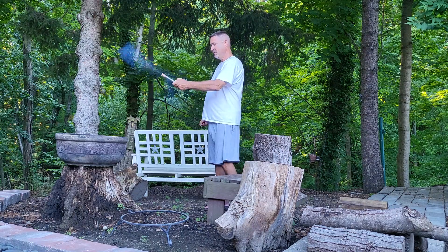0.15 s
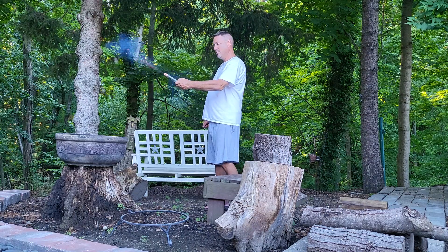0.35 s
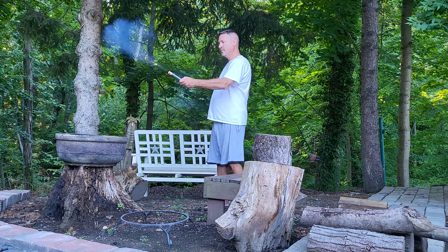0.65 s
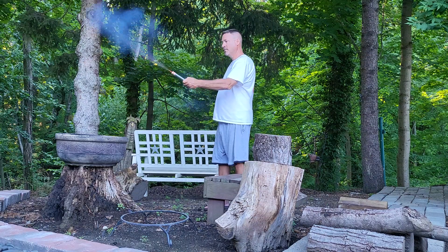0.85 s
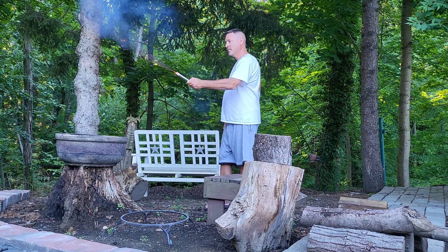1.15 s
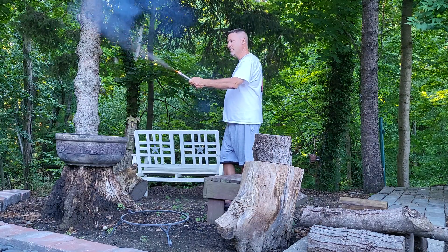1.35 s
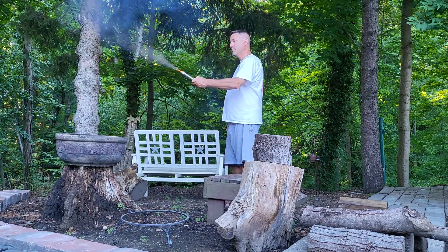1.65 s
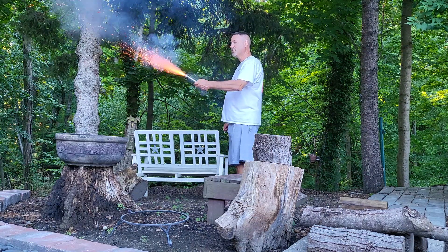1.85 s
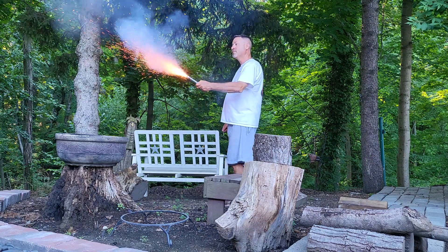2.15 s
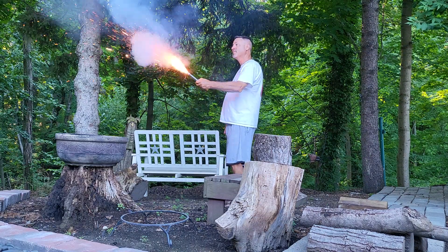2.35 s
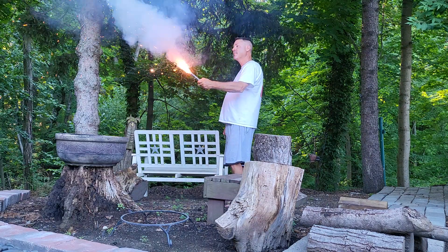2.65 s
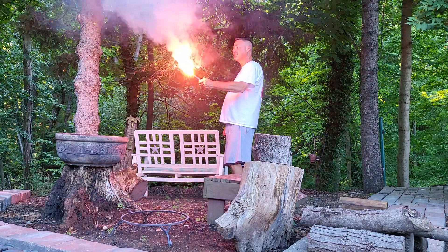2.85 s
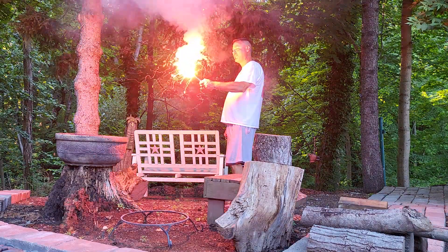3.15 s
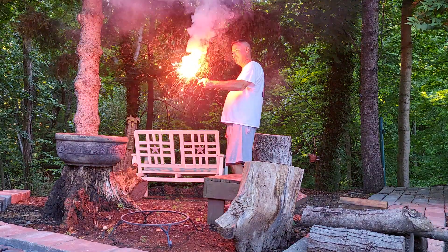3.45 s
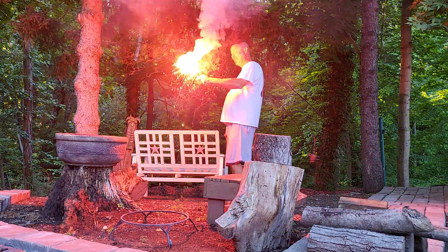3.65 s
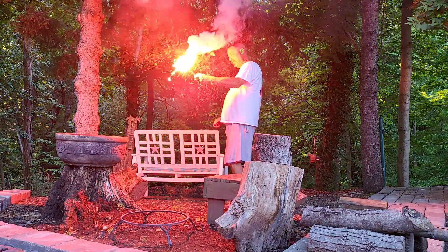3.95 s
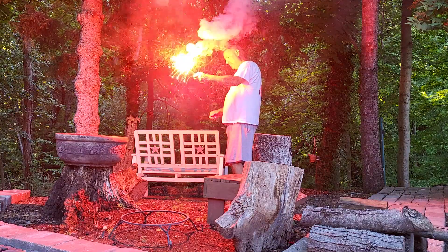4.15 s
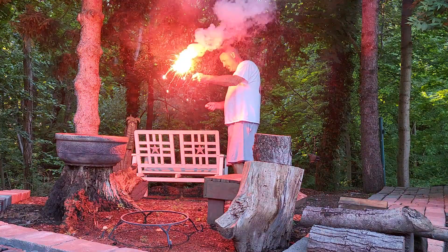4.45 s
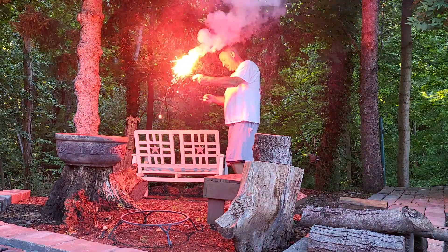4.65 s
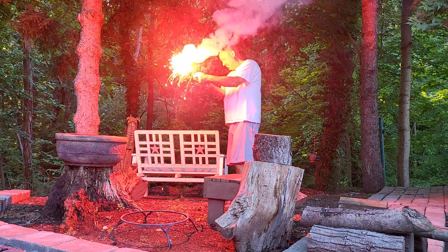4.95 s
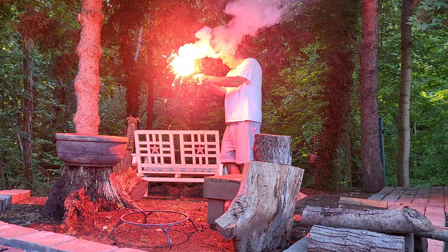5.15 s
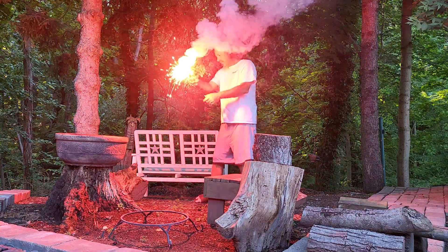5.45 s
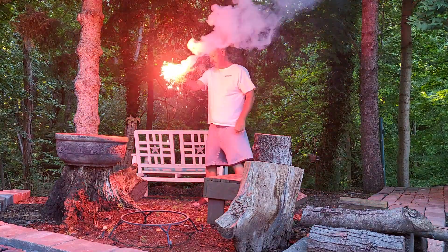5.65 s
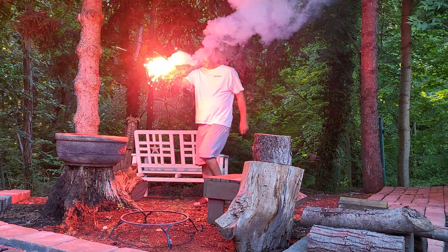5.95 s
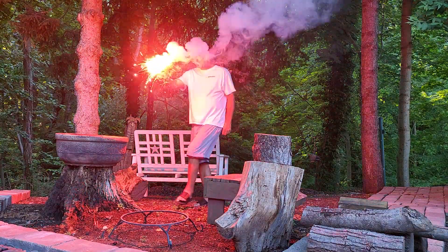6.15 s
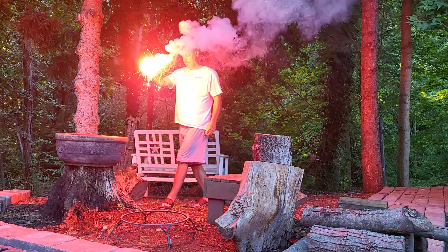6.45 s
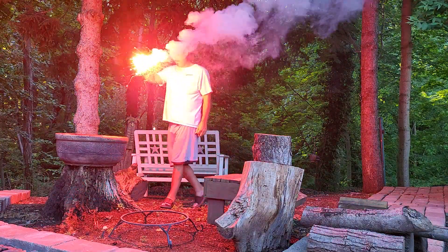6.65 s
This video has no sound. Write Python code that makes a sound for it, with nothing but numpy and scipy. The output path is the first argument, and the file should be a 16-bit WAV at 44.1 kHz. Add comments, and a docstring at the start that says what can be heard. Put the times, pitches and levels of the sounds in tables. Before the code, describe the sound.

Outdoors in a wooded yard, a handheld flare is heard from a few metres through a stereo camera microphone, over very faint open-air murmur. At 0 s it smoulders with a thin hiss and low gassy drone; small spits begin near 0.14 s and cluster from 0.4 s. The hiss swells quickly through 0.7-1.0 s, with irregular snaps, raspy bursts and low puffs continuing to 1.75 s. At about 1.8 s a sharp, loud bang cracks, with a short slap echo and tree scatter. The hiss cuts away to a soft, fluttering jet, weakening until a muted whoomph around 2.4 s. A fine sizzle grows from 2.5 s, rises steeply around 3.0-3.3 s, and from 3.8 s stays a loud, bright, gritty hiss with dense sparks and soft low flame rumble, gently surging until the end near 7 s, without fading.

```python
"""Handheld flare in a wooded yard

A flare is lit a few metres from a camera with two microphone ports, in the faint murmur of open air.
Its primer hisses and spits ever harder, blows out with a bang and leaves a soft jet of flame;
then the main charge catches and burns with a loud hiss, fine sparks and a rumbling flame.
Gas is shaped noise, sparks are random bursts, and snaps and bang are pressure shocks.
Stumps, a wall and the trees answer with echoes and scattered tails."""
import sys
import numpy as np
from scipy import signal
from scipy.fft import rfft, irfft, next_fast_len
from scipy.io import wavfile
from scipy.ndimage import map_coordinates

SR = 44100
rng = np.random.default_rng(int(sys.argv[2]) if len(sys.argv) > 2 else 0)


def bounce(signal):
    """Save signal as a 16-bit WAV file at the path given by the first command-line argument."""
    frames = np.transpose(np.atleast_2d(signal))
    limited = np.clip(frames, -1, 1)
    pcm = np.round(limited * 32767).astype(np.int16)
    wavfile.write(sys.argv[1], SR, pcm)


N = 299880


def amp(db):
    """Amplitude factor of a level in dB."""
    return 10 ** (np.asarray(db) / 20)


def unit(x):
    """x at rms 1."""
    return x / np.sqrt(np.mean(x ** 2) + 1e-20)


def along(points, hz):
    """Reads (frequency [Hz], value) points on a log frequency axis."""
    point_hz, values = np.transpose(points)
    return np.interp(np.log(hz + 1), np.log(point_hz + 1), values)


def curves(rows):
    """One value per sample for each column after the time."""
    times, *columns = np.transpose(rows)
    return [np.interp(np.arange(N) / SR, times, column) for column in columns]


def ramp(start, length):
    """Rises from 0 to 1 over length seconds."""
    return np.clip((np.arange(N) / SR - start) / length, 0, 1)


def swell(centre, half_length):
    """A smooth rise to 1 and back, down to 1/e at half_length seconds from the centre."""
    return np.exp(-((np.arange(N) / SR - centre) / half_length) ** 2)


def since(start):
    """Seconds gone by after start, 0 before it."""
    return np.maximum(np.arange(N) / SR - start, 0)


def wobble(rate):
    """A smooth random curve, rate knots a second."""
    knots = rng.standard_normal(int(N * rate / SR) + 4)
    return map_coordinates(knots, [np.arange(N) * rate / SR])


def filtered(x, response):
    """x times a response of frequency."""
    size = next_fast_len(N + SR // 2)
    spectrum = rfft(x, size) * response(np.fft.rfftfreq(size, 1 / SR))
    return irfft(spectrum, size)[..., :N]


def coloured(x, spectrum):
    """x shaped by the given spectrum, at rms 1."""
    return unit(filtered(x, lambda hz: amp(along(spectrum, hz))))


def rush(spectrum, flutter_db, rate):
    """Turbulent noise whose strength flutters."""
    return coloured(rng.standard_normal(N) * amp(flutter_db * wobble(rate)), spectrum)


def crackle(spectrum, rate, spread_db):
    """Tiny bursts at random moments, rate a second on average, most small, a few large."""
    fires = rng.random(N) < rate / SR
    size = amp(spread_db * np.clip(rng.standard_normal(N), -2.5, 2.5))
    return coloured(fires * size * rng.choice([-1, 1], N), spectrum)


def shock(start, width):
    """A small explosion: a pressure step, then suction."""
    u = np.maximum(np.arange(N) / SR - start, 0) / width
    return (u > 0) * (1 - u) * np.exp(-np.minimum(u, 30))


# Murmur of the open air around the yard: (frequency [Hz], level [dB])
AIR_SPECTRUM = [(20, -14), (60, -2), (160, 5), (350, -10.5), (1000, -14.5), (3000, -3), (15000, -39)]


def air():
    """The faint steady murmur of the open air, nearly alike at both ports."""
    mid, side = (coloured(noise, AIR_SPECTRUM) for noise in rng.standard_normal((2, N)))
    return amp(-59.5) * (mid + amp(-9) * np.array([side, -side]))


def scatter(x, t60, share, build, count, size):
    """A diffuse stereo answer of decaying noise, renewed count times as the flame moves."""
    hz, t, grains = signal.stft(rng.standard_normal((count, 2, size)), SR, nperseg=256)
    level_db = along(share, hz)[:, None] - 60 * t / along(t60, hz)[:, None]
    fade = amp(level_db) * (1 - np.exp(-t / build))
    tails = signal.istft(grains * fade, SR, nperseg=256)[1]
    hop = N // (count - 1) + 1
    window = np.sqrt(np.hanning(2 * hop))
    padded, out = np.pad(x, (hop, 2 * hop)), np.zeros((2, N + 3 * hop + SR))
    for k, tail in enumerate(tails):
        piece = padded[k * hop:][:2 * hop] * window
        answer = signal.fftconvolve(piece[None], tail / np.linalg.norm(tail[0]), axes=1)
        out[:, k * hop:k * hop + answer.shape[1]] += answer
    return out[:, hop:hop + N]


# Hard surfaces (a ledge by the camera, the ground, a wall): (delay [ms], level [dB])
HARD_ECHOES = [(1.07, -6.5), (6.1, -23.5), (47, -15)]
# Bearing of the flare: (time [s], lead of the left port [ms])
FLARE_BEARING = [(0, 0.1), (3.3, 0.069), (5.4, 0.081), (6, 0.09), (6.8, 0.12)]
# What the stumps send back: (frequency [Hz], level [dB])
STUMP_RETURN = [(100, -14), (400, -6.5), (1500, -7.5), (4000, -1.5), (8000, -1), (15000, 0)]
# What the trees send back: (frequency [Hz], level [dB])
TREE_RETURN = [(100, -4), (400, -2.8), (3000, 1), (8000, 2.1), (15000, 1.5)]
# How long the trees ring on: (frequency [Hz], 60 dB decay time [s])
TREE_DECAY = [(60, 0.11), (500, 0.4), (1400, 0.46), (3300, 0.71), (6000, 0.52), (14000, 0.42)]


def yard(x, rough_hz=6500):
    """Direct sound and hard echoes reach the two ports; stumps and trees scatter the rest."""
    def near_response(hz):
        echoes = sum(amp(db) * np.exp(-2j * np.pi * hz * ms / 1000) for ms, db in HARD_ECHOES)
        return 1 + echoes / (1 + (hz / rough_hz) ** 4)  # rough surfaces mirror little treble

    near = filtered(x, near_response)
    lead_ms, = curves(FLARE_BEARING)
    half_lead = lead_ms * SR / 2000  # samples; each port is shifted by half the lead
    direct = np.array([map_coordinates(near, [np.arange(N) + side * half_lead], order=5)
                       for side in (1, -1)])
    stump_decay = [(200, 0.084), (12000, 0.096)]  # (frequency [Hz], 60 dB decay time [s])
    stumps = scatter(x, stump_decay, STUMP_RETURN, build=0.00071, count=240, size=3072)
    trees = scatter(x, TREE_DECAY, TREE_RETURN, build=0.012, count=60, size=20480)
    return amp(-3.0) * direct + amp(-2.0) * stumps + amp(-7.5) * trees


# Peaks and hollows of the camera's nook: (frequency [Hz], width [Hz], level [dB])
NOOK_RESONANCES = [(168, 26, 2.5), (348, 25, 4), (617, 36, 2.5), (1210, 120, 2), (1534, 66, -7),
                   (1840, 97, 1.5), (2410, 280, -4), (3440, 400, -1.5), (3900, 174, 3), (4120, 150, 1.5),
                   (4860, 83, 3), (6000, 210, -1.5), (6500, 250, 3.5), (7300, 230, 4.5)]


def nook(hz):
    """Causal resonant peaks and hollows of the sound at the camera."""
    return np.prod([1 + (amp(db) - 1) * 1j * hz * width / (centre ** 2 - hz ** 2 + 1j * hz * width)
                    for centre, width, db in NOOK_RESONANCES], axis=0)


# Shading of the two microphone ports: (frequency [Hz], left minus right [dB])
PORT_SHADING = [(300, 0), (1100, 1.8), (2100, 0), (2900, 3.5), (4000, 0), (4900, -0.5), (6500, 5),
                (7300, 6), (8100, -4.5), (9300, 4), (11500, 4), (13500, 5.5)]


def ports(hz):
    """Each microphone port shades the sound in its own way; their summed power is kept."""
    lean = amp(along(PORT_SHADING, hz))
    return np.array([lean, np.ones_like(lean)]) * np.sqrt(2 / (1 + lean ** 2))


def spit_gate(start, length, rise=0.0012, fall=0.0059):
    """Opens fast, holds while a spit lasts, then dies away exponentially."""
    return ramp(start, rise) * np.exp(-30 * ramp(start + length, 30 * fall))


# The primer's spits; the last is its blow-out:
# (start [s], length [s], rasp level [dB], puff level [dB])
PRIMER_SPITS = [(0.138, 0.016, -50, -47), (0.406, 0.026, -45.5, -47), (0.453, 0.0091, -49, -45),
                (0.495, 0.0045, -48, -38), (0.527, 0.018, -45, -46), (0.625, 0.012, -43.5, -55),
                (0.678, 0.018, -44, -43), (0.775, 0.015, -38, -34.5), (0.887, 0.0048, -28.5, -42),
                (0.907, 0.015, -39, -40), (0.941, 0.013, -26.5, -23.5), (0.974, 0.02, -33.5, -24),
                (1.058, 0.01, -32.5, -28.5), (1.085, 0.015, -33, -27.5), (1.129, 0.021, -32, -32),
                (1.156, 0.017, -26, -29.5), (1.21, 0.0077, -31.5, -46), (1.26, 0.017, -28.5, -24.5),
                (1.348, 0.019, -27.5, -30), (1.429, 0.017, -29, -29), (1.539, 0.018, -25.5, -25.5),
                (1.602, 0.016, -24, -24.5), (1.717, 0.025, -25, -30), (1.794, 0.022, -18, -26)]
# Hiss of the primer: (frequency [Hz], level [dB])
PRIMER_SPECTRUM = [(150, -36), (500, -15), (1300, -9), (2000, -5), (3000, -5), (4000, -1.5), (5300, -2.5),
                   (7000, 1.5), (9000, -4), (11000, -3.5), (14000, -0.5)]
# Drone of gas in the tube's mouth: (frequency [Hz], level [dB])
DRONE_SPECTRUM = [(25, -24), (62, 0.5), (100, -7), (175, 1.5), (250, -12), (350, -8.5), (480, -15.5),
                  (900, -23.5), (2000, -36.5)]
PRIMER_START_DB = -49.5  # the primer smoulders at first
# The fire spreads in an S-curve: fastest moment [s], time constant [s], growth [dB]
SPREAD_AT, SPREAD_TIME_S, SPREAD_DB = 0.69, 0.26, 27
# The primer chokes once, then flares up just before it blows out: moment [s], half length [s], change [dB]
FALTER_AT, FALTER_S, FALTER_DB = 1.03, 0.033, 4.5
FLARE_UP_AT, FLARE_UP_S, FLARE_UP_DB = 1.752, 0.032, 3.5
SURGE_DB, SURGE_SHRINK = 8.5, 0.27  # a spit's lift of the smouldering hiss; dB of lift lost per dB of growth
# The drone weakens as the mouth burns open
DRONE_DB, DRONE_FADE_AT, DRONE_FADE_DB_PER_S = -42, 0.93, 4


def primer():
    """The primer hisses and crackles, lifted by spits, until spent; its gas drones in the tube's mouth."""
    growth_db = SPREAD_DB / (1 + np.exp((SPREAD_AT - np.arange(N) / SR) / SPREAD_TIME_S))
    falter_db = FALTER_DB * swell(FALTER_AT, FALTER_S)
    flare_up_db = FLARE_UP_DB * swell(FLARE_UP_AT, FLARE_UP_S)
    level_db = PRIMER_START_DB + growth_db - falter_db + flare_up_db
    surge_db = np.maximum(SURGE_DB - SURGE_SHRINK * growth_db, 0)
    spitting = sum(spit_gate(start, length) for start, length, _, _ in PRIMER_SPITS)
    hiss = rush(PRIMER_SPECTRUM, flutter_db=1.9, rate=120)
    gas = hiss + amp(-4.0) * crackle(PRIMER_SPECTRUM, rate=1100, spread_db=3.5)
    drone_db = DRONE_DB - DRONE_FADE_DB_PER_S * since(DRONE_FADE_AT)
    drone = amp(drone_db) * rush(DRONE_SPECTRUM, flutter_db=1.2, rate=25)
    return (amp(level_db + surge_db * spitting) * gas + drone) * (1 - ramp(1.775, 0.02))


# Rasp of a spit: (frequency [Hz], level [dB])
RASP_SPECTRUM = [(100, -21), (350, 1.5), (700, -1.5), (2000, 0), (4000, -5), (8000, -11), (15000, -15)]
# Low puff of a spit: (frequency [Hz], level [dB])
PUFF_SPECTRUM = [(25, -28), (60, -5.5), (100, -2.5), (165, 0.5), (240, -8.5), (380, -7), (700, -18.5),
                 (2000, -35)]


def spits():
    """Each spit opens with a snap and goes on as a rasp of small bursts on a low puff of gas."""
    rasp, puff, snaps = np.zeros((3, N))
    for start, length, rasp_db, puff_db in PRIMER_SPITS:
        gate = spit_gate(start, length)
        rasp += amp(rasp_db) * gate
        puff += amp(puff_db) * gate
        snaps += amp(rasp_db + 16.5) * shock(start + 0.002025, width=0.00029)
    bursts = crackle(RASP_SPECTRUM, rate=550, spread_db=3)
    grit = amp(-2) * rush(RASP_SPECTRUM, flutter_db=5, rate=330) + amp(2) * bursts
    gas = rush(PUFF_SPECTRUM, flutter_db=2, rate=100)
    snap_band = signal.butter(1, [250, 3000], "band", fs=SR, output="sos")
    return signal.sosfilt(snap_band, snaps) + rasp * grit + amp(-2.0) * puff * gas


BANG_AT = 1.7935  # s
SLAP_S, SLAP_DB = 0.042, -6.5  # the shock slaps back from the wall: delay, level


def bang():
    """The primer blows out with one sharp shock, which slaps back from the wall."""
    crack = 1.15 * shock(BANG_AT, width=0.0004)
    slap = amp(SLAP_DB) * shock(BANG_AT + SLAP_S, width=0.0003)
    band = signal.butter(1, [300, 4000], "band", fs=SR, output="sos")
    return signal.sosfilt(band, crack + slap)


def jolt(hz=62, length=0.027, drive=3.2):
    """The shock jolts the right microphone into a brief, saturated low swing, faint at the left."""
    t = since(BANG_AT)
    swing = np.tanh(drive * np.sin(2 * np.pi * hz * t)) * np.exp(-(t / length) ** 4)
    return amp([[-40], [-13]]) * swing


# Soft jet from the opened tube: (frequency [Hz], level [dB])
JET_SPECTRUM = [(80, -23), (170, -2.5), (450, -3.5), (900, -4), (1500, -6), (2000, -5.5), (3000, -11),
                (4300, -5.5), (6000, -17.5), (9000, -21), (14000, -17)]
JET_DB, JET_SAG_DB_PER_S = -46.5, 5.4  # the jet loses pressure


def jet():
    """A soft flame streams from the opened tube until the main charge takes over."""
    level_db = JET_DB - JET_SAG_DB_PER_S * since(2.0)
    gate = ramp(1.85, 0.2) * (1 - ramp(2.62, 0.21))
    return amp(level_db) * rush(JET_SPECTRUM, flutter_db=2.5, rate=47) * gate


# Strength of the main charge, which drives its hiss, sparks and rumble: (time [s], level [dB])
BURN_STRENGTH = [(2.48, -54), (2.82, -47.5), (3.0, -44), (3.14, -34.4), (3.32, -32), (3.4, -34),
                 (3.76, -30.5), (3.82, -28.5), (4.26, -28.5), (4.7, -31), (4.84, -29.5), (5.1, -29.5),
                 (5.44, -28), (5.52, -31.5), (5.68, -28), (6.28, -30), (6.46, -28.0), (6.78, -29)]
FULL_BURN_DB = -28.5  # the table's level at full burn


def strength_db():
    """How hard the main charge burns, in dB from its full burn."""
    return curves(BURN_STRENGTH)[0] - FULL_BURN_DB


# Rumble of the billowing flame: (frequency [Hz], level [dB])
FLAME_SPECTRUM = [(15, -33), (35, -15.5), (60, -1.0), (120, 1), (170, -3.5), (260, -7), (350, -11),
                  (600, -11), (2000, -62)]
RUMBLE_DB, RUMBLE_GROWS = -43.5, 0.89  # level at full burn; dB per dB of burn strength
RUMBLE_DB_PER_S = 0.45  # the billowing grows as the flame widens
CATCH_AT, CATCH_S, CATCH_DB = 2.44, 0.11, -56.5  # soft whoomph: moment [s], half length [s], level
OPEN_AT, OPEN_S = 2.98, 0.26  # the charge opens: start, length [s]


def flame():
    """Hot gas rumbles from the opened tube: a whoomph as the charge catches, then in step with the burn."""
    billow_db = RUMBLE_DB + RUMBLE_GROWS * strength_db() + RUMBLE_DB_PER_S * since(OPEN_AT)
    billow = amp(billow_db) + amp(CATCH_DB) * swell(CATCH_AT, CATCH_S)
    rumble = coloured(rng.standard_normal(N), FLAME_SPECTRUM)
    return billow * rumble * ramp(BANG_AT, 0.03)


# Hiss of the main charge: (frequency [Hz], level [dB])
BURN_SPECTRUM = [(150, -44), (450, -14.5), (1000, -8.5), (1450, -7.5), (2000, -4.5), (2600, -5.5),
                 (3500, -3.5), (4700, -0.5), (6800, -3), (9000, -9), (15000, -9)]
# Fine spray of sparks: (frequency [Hz], level [dB])
SPARK_SPECTRUM = [(1500, -21), (5000, -34), (9000, -2), (13000, 0), (16000, 0)]
HISS_DB, SPARKS_DB = -30.5, -31.5  # base levels at full burn
SPARKS_GROW = 1.6  # dB per dB of burn strength
SPARKS_DB_PER_S = 0.52  # the spray thickens as the charge burns in
# The hiss's low end comes in as the charge opens, then keeps growing
SHUT_DB, WIDEN_DB_PER_S = -4.5, 0.56


def burn():
    """The main charge: a surging, gritty hiss of gas and a fine spray of sparks."""
    hiss_db = HISS_DB + strength_db()
    thickening_db = SPARKS_DB_PER_S * since(OPEN_AT)
    sparks_db = SPARKS_DB + SPARKS_GROW * strength_db() + thickening_db + 0.39 * wobble(11)
    body_db = SHUT_DB * (1 - ramp(OPEN_AT, OPEN_S)) + WIDEN_DB_PER_S * since(OPEN_AT) - 1.7
    surge_db = 0.6 * wobble(40) + 0.7 * wobble(140)
    grit = crackle(BURN_SPECTRUM, rate=700, spread_db=4)
    gas = rush(BURN_SPECTRUM, flutter_db=0.8, rate=250) + amp(-7) * grit
    low = filtered(gas, lambda hz: 1 / (1 + (hz / 3000) ** 4))
    hiss = amp(hiss_db + surge_db) * (gas - low + amp(body_db) * low) * ramp(2.37, 0.23)
    fizz = amp(-6.0) * rush(SPARK_SPECTRUM, flutter_db=5.0, rate=98)
    sparks = amp(-2.5) * crackle(SPARK_SPECTRUM, rate=980, spread_db=7.5)
    return hiss + amp(sparks_db + surge_db) * (fizz + sparks) * ramp(2.2, 0.18)


def scene():
    """The flare sounds through the yard; the jolt and the open air reach the ports directly."""
    flare = primer() + spits() + bang() + jet() + burn() + flame()
    return yard(flare) + jolt() + air()


TOP_HZ = 15760  # the camera's band limit


def record(dry):
    """The camera colours the sound, rounds off the loudest peaks and filters out all above its band limit."""
    heard = filtered(dry, lambda hz: nook(hz) * ports(hz))
    rounded = heard / (1 + (heard / 0.8) ** 4) ** 0.25
    return filtered(rounded, lambda hz: hz < TOP_HZ)


dry = scene()
out = record(dry)
bounce(out)
```